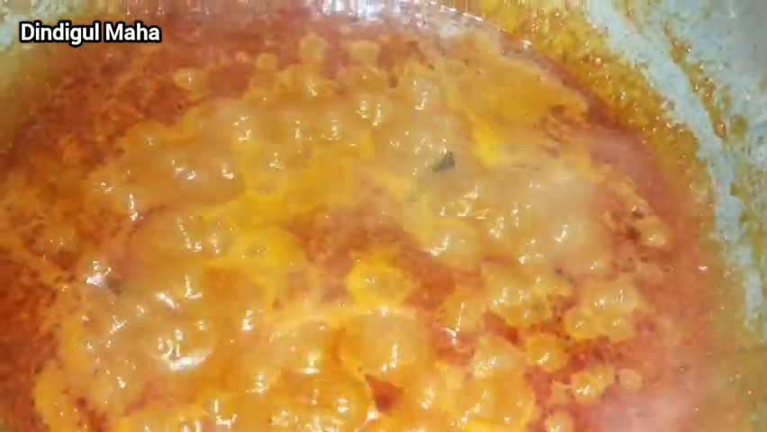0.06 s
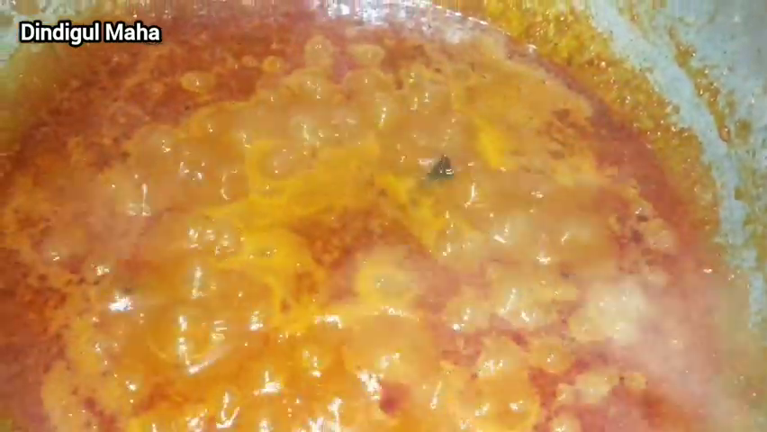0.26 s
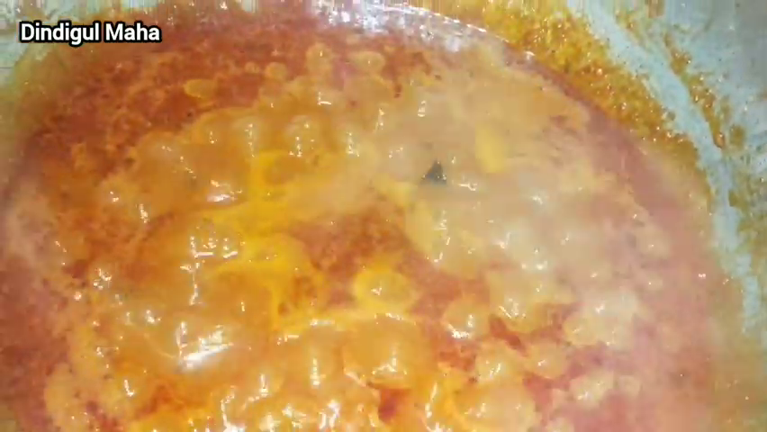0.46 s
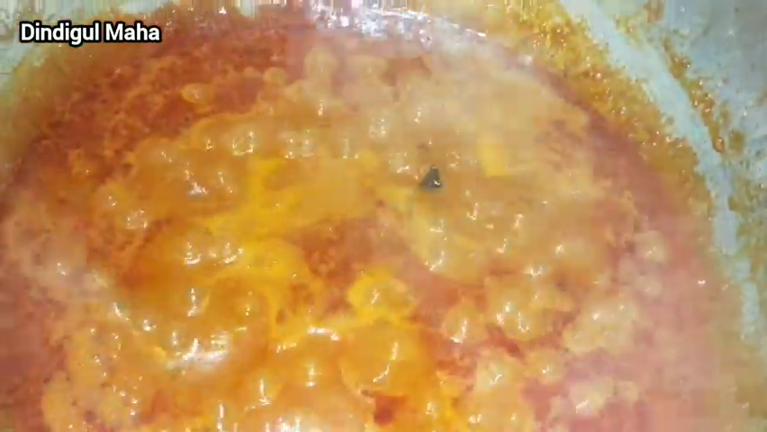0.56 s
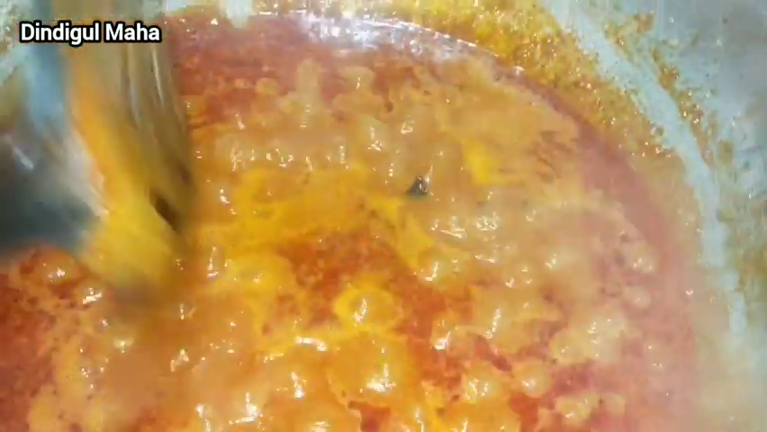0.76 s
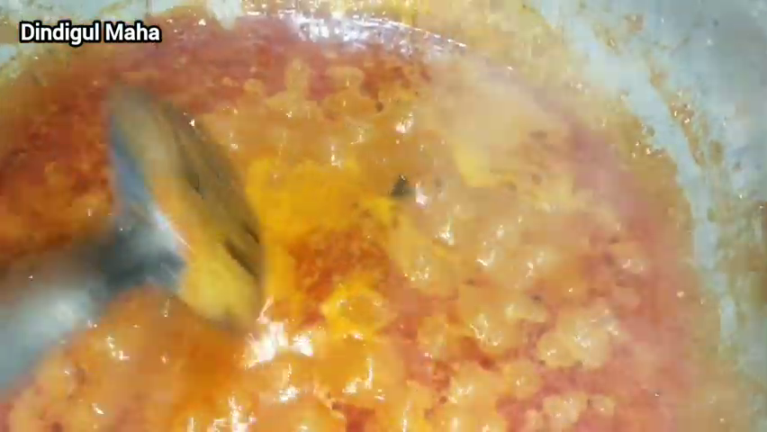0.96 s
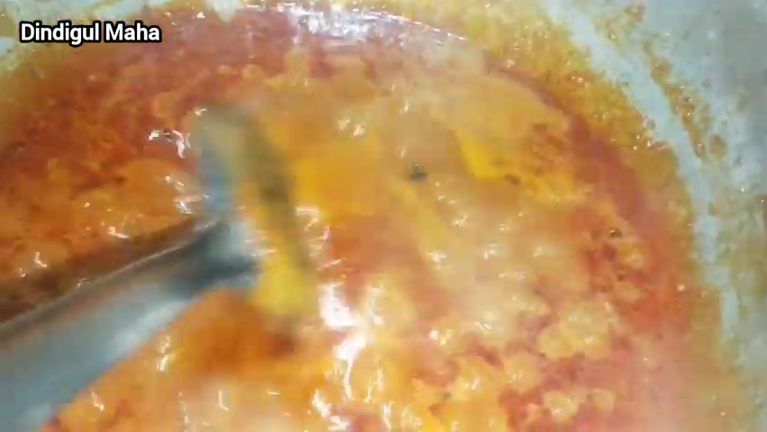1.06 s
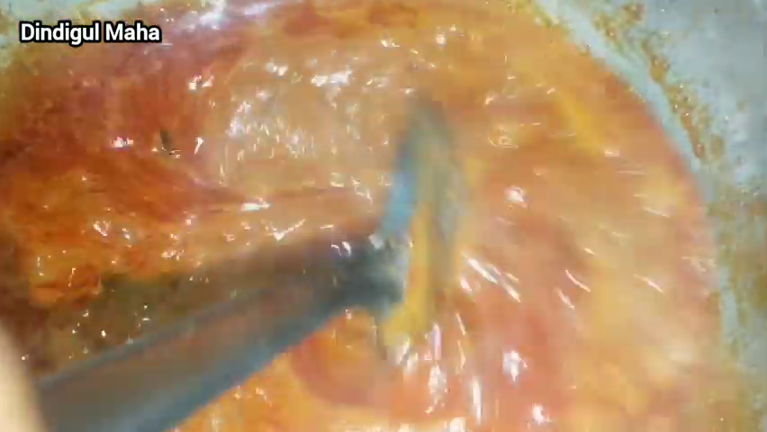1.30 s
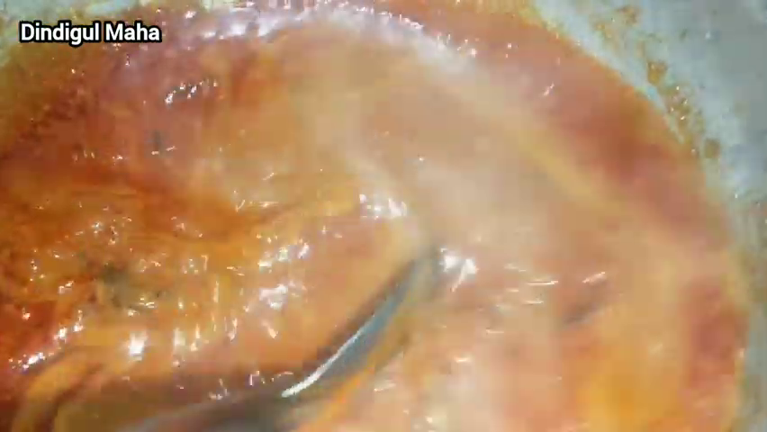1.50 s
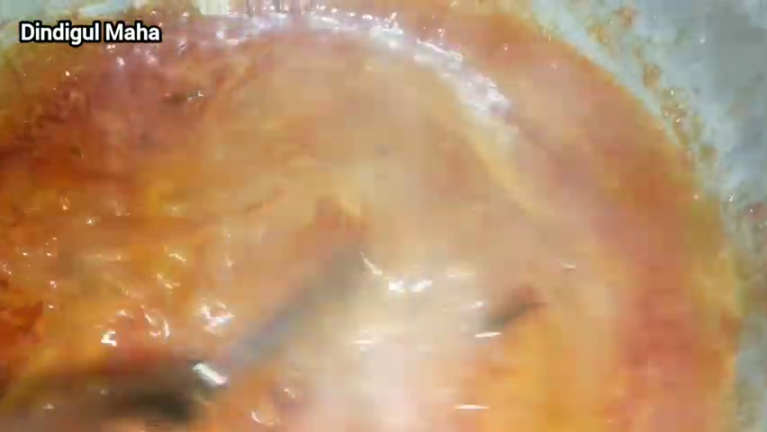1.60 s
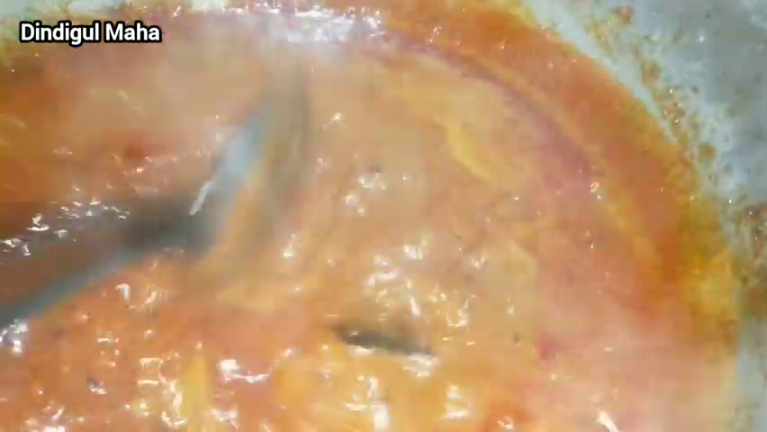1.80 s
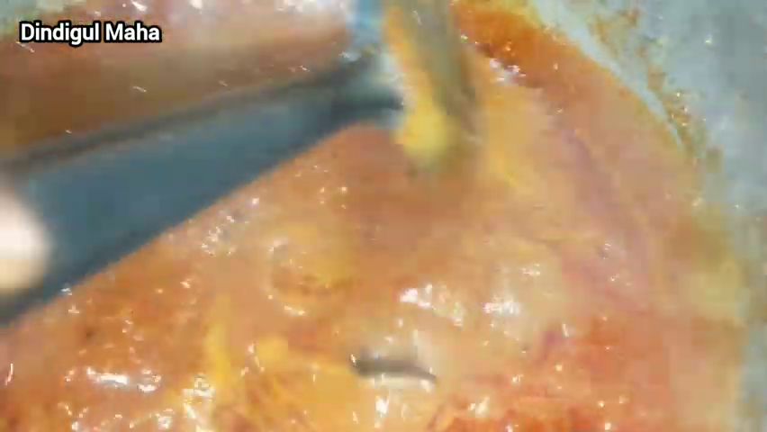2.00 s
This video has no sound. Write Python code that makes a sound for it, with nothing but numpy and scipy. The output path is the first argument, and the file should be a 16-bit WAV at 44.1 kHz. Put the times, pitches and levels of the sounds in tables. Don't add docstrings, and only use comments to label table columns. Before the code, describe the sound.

Bubbling thick sauce with faint steam hiss, a hard steel ladle knock early, low burner drone

```python
import sys
import numpy as np
from scipy import signal
from scipy.fft import rfft, irfft
from scipy.io import wavfile
from scipy.ndimage import uniform_filter1d

SR = 44100
rng = np.random.default_rng(int(sys.argv[2]) if len(sys.argv) > 2 else 0)


def volts(x):
    e = np.asarray(x, float) / 20
    return 10 ** e


def dump_mix(stems):
    frames = np.atleast_2d(stems).T
    limited = np.clip(frames, -1, 1)
    pcm = np.round(limited * 32767).astype(np.int16)
    wavfile.write(sys.argv[1], SR, pcm)


N = 90404
TIME_S = np.arange(N) / SR
BINS = np.fft.rfftfreq(2048, 1 / SR)

# hz, level_db (per Hz)
SAUCE_SPECTRUM = [(140, -11), (595, -11), (933, -12.5), (2530, -12.5), (3260, -15), (3890, -18.5),
                  (5020, -20), (11000, -46.5), (15000, -58.5)]


def evened(x):
    return x / np.sqrt(np.mean(x ** 2) + 1e-20)


def read(points, hz):
    f, value = np.transpose(points)
    return np.interp(np.log(hz + 1), np.log(f + 1), value)


def add(mix, s, sound):
    part = mix[round(s * SR):][:len(sound)]
    part += sound[:len(part)]


def causal(db):
    log_gain = np.log(volts(np.maximum(db, -100)))
    mirrored = np.r_[log_gain, log_gain[-2:0:-1]]
    return np.fft.ifft(np.exp(np.conj(signal.hilbert(mirrored)))).real


def port_pair(left, other, hz):
    # hz, likeness (-1 to 1)
    likeness = [(60, 1), (180, 0.95), (550, 0.59), (1650, -0.46), (4970, 0.87), (15000, -0.88)]
    same = np.clip(read(likeness, hz), -1, 1)[:, None]
    return np.array([left, same * left + np.sqrt(1 - same ** 2) * other])


def burner():
    # pitch_hz, width_hz, level_db
    drone = [(75.1, 9, -66.5), (101.65, 4, -59.5), (126.5, 4.7, -65.5), (180.7, 6.1, -65)]
    # hz, level_db (per Hz)
    rumble = [(12, -46), (20, -26), (48, -11), (76, -20), (97, -16), (195, 2), (260, -19), (340, -43),
              (570, -120)]
    # time_s, level_db
    flame = [(0, -3.5), (.3, 3), (0.549, 3), (.75, 3), (.85, 3), (1.101, 2.5), (1.25, 2), (1.45, -6),
             (1.652, -1.5), (1.75, -1.5), (1.87, -0.5), (2.05, -4)]
    rumble_db, hum_hz, hum_db = -67.5, 102, -55.5
    hz = np.fft.rfftfreq(N, 1 / SR)
    power = (volts(rumble_db) * evened(volts(read(rumble, hz) - 200 * (hz > 300)))) ** 2
    for pitch_hz, width_hz, level_db in drone:
        resonance = 1 / (1 + (2 * (hz - pitch_hz) / width_hz) ** 2)
        power += (volts(level_db) * evened(resonance)) ** 2
    noise = rng.standard_normal((2, N))
    common, apart = irfft(rfft(noise, axis=1) * np.sqrt(power), N, axis=1)
    common = common + volts(hum_db) * np.sin(2 * np.pi * hum_hz * TIME_S)
    ports = np.array([common + 0.084 * apart, common - 0.093 * apart])
    return ports * volts(np.interp(TIME_S, *np.transpose(flame)))


def kitchen(x):
    # hz, t60_s
    decay = [(300, 0.44), (1000, 0.28), (2000, 0.25), (5000, 0.28), (12000, 0.38)]
    rise_s = 0.008
    out, turn = 0, TIME_S * 7
    for k in range(3):
        hz, t, z = signal.stft(rng.standard_normal((2, SR * 3 // 4)), SR, nperseg=256)
        z = port_pair(z[0], z[1], hz)
        t60_s = np.maximum(read(decay, hz), 0.05)[:, None]
        tail = signal.istft(z * volts(-60 * t / t60_s), SR, nperseg=256)[1]
        tail = tail * np.minimum(np.arange(tail.shape[1]) / SR / rise_s, 1) ** 2
        tail = tail / np.linalg.norm(tail[0])
        window = np.sqrt(2 / 3) * np.cos(turn + k * np.pi / 3)
        out = out + signal.fftconvolve((x * window)[:, None], tail[None], axes=2)[..., :N]
    return out


def simmer_db(t):
    # time_s, level_db
    boil = [(0, -45.5), (.09, -52), (.46, -41.5), (.68, -45.5), (.82, -44.5), (1.19, -45), (1.36, -46),
            (1.42, -48.5), (1.66, -52.5), (1.745, -54.5), (1.785, -45), (1.851, -51.5), (1.96, -53.5),
            (2.05, -52)]
    return np.interp(t, *np.transpose(boil))


def hiss():
    patch_db, flicker_db, hiss_db = 2, 4, -3.5
    tilt_per_octave, dulling = 0.1, 0.6
    frames, hz = N // 64 + 6, np.fft.rfftfreq(256, 1 / SR)
    column_hz = hz[:, None]
    a, b, c, d, patches, flicker = rng.standard_normal((frames, 129, 6)).T
    patches = evened(uniform_filter1d(uniform_filter1d(patches, size=3, axis=0), size=40, axis=1))
    flicker = evened(uniform_filter1d(uniform_filter1d(flicker, size=20, axis=0), size=2, axis=1))
    boil_db = simmer_db(np.arange(frames) * 64 / SR) + 50
    tilt_db = tilt_per_octave * np.log2(np.maximum(column_hz, 1000) / 1000) * boil_db / 2
    tilt_db = tilt_db + dulling * np.minimum(boil_db, 0) / (1 + (1050 / (column_hz + 1)) ** 6)
    patches_db = patch_db * np.sqrt(1 + (column_hz / 4000) ** 2) * patches
    level_db = read(SAUCE_SPECTRUM, column_hz) + patches_db + flicker_db * flicker + tilt_db
    z = port_pair(a + 1j * b, c + 1j * d, hz) * volts(level_db)
    noise = evened(signal.istft(z, nperseg=256, noverlap=192)[1][:, :N])
    return volts(simmer_db(TIME_S) + hiss_db) * noise


def bubble(hz, cycles):
    glide = 0.067
    u = np.arange(round(3 * cycles * SR / hz)) * hz / SR / cycles
    tone = np.sin(2 * np.pi * cycles * (u + glide * u ** 2 / 2))
    onset = np.sin(np.minimum(u * 3.3, np.pi / 2)) ** 2
    return tone * onset * np.exp(-u * 2.52)


def big_bubbles():
    # start_s, level_db, pitch_hz
    bursts = [(0.863, -42, 555), (0.864, -34, 1500), (0.816, -32, 990), (0.989, -35, 1150),
              (1.034, -28.5, 1750), (1.038, -35, 1720), (1.044, -43, 2060), (1.029, -33.5, 575),
              (1.078, -53, 1500), (1.101, -40, 1090), (1.129, -34, 740), (1.1286, -48, 2080),
              (1.168, -38, 1750), (1.1835, -32, 1950), (1.207, -39, 653), (1.234, -38, 2300),
              (1.283, -58, 606), (1.317, -58, 2570), (1.457, -43, 750), (1.629, -36.5, 1150),
              (1.63, -41, 1990), (1.678, -42, 805), (1.792, -43, 1277), (1.805, -45.5, 664),
              (1.9228, -38, 1640), (2.038, -38.5, 766), (0.9, -34, 990), (0.922, -30, 1200),
              (0.925, -36, 1870), (1.015, -31.5, 844), (1.03, -24.5, 1630), (1.066, -39, 667),
              (1.115, -33, 652), (1.167, -46, 620), (1.319, -40, 640), (1.338, -33.5, 710),
              (1.423, -62, 595), (1.486, -34, 1700), (1.562, -34.5, 3030), (1.586, -33.5, 2357),
              (1.623, -39, 616), (1.759, -34, 1356), (1.837, -36.5, 1110), (1.861, -32.5, 1287),
              (1.922, -52, 530), (1.973, -46, 653), (1.994, -59, 713), (2.016, -53, 628)]
    # start_s, level_db, pitch_hz
    crackles = [(1.0463, -38.5, 5400), (1.17, -46, 2100), (1.3478, -40, 2500), (1.4871, -38.5, 2560),
                (1.5637, -40, 3200), (1.587, -46, 2840), (1.688, -49, 3150), (1.7576, -38, 2100),
                (1.764, -35, 2200), (2.1, -38, 2900), (1.7876, -46, 2330), (1.7879, -32.5, 3280),
                (1.805, -56, 1300), (1.7955, -37, 4050), (0.6, -63, 2000), (1.6, -44, 2700),
                (1.82, -40, 3900), (1.564, -42, 3650), (2.8, -44.5, 3600), (2.047, -46, 3100),
                (1.8888, -42.5, 4830), (1.9394, -39, 4470), (2.04, -46.5, 4700)]
    out = np.zeros(N)
    for start_s, level_db, pitch_hz in bursts:
        add(out, start_s, volts(level_db + 4.5) * bubble(pitch_hz, 4.56))
    for start_s, level_db, pitch_hz in crackles:
        add(out, start_s, volts(level_db + 11) * bubble(pitch_hz, 3.5 * pitch_hz / 2500))
    return out


def fizz():
    bubbles_per_s, spread_db, fizz_db = 360, 2.5, -10.5
    size = volts(np.minimum(spread_db * rng.exponential(1, N), 7))
    size = size * (rng.random(N) < bubbles_per_s / SR)
    kind, pitches_hz = rng.integers(0, 24, N), np.geomspace(520, 5000, 24)
    out = np.zeros(N)
    for k, hz in enumerate(pitches_hz):
        pop = volts(read(SAUCE_SPECTRUM, hz) + 1.4 * np.log2(hz)) * bubble(hz, 3.37)
        out += signal.oaconvolve(size * (kind == k), pop)[:N]
    return volts(simmer_db(TIME_S) + fizz_db) * evened(out)


def knock(level_db, rattle_s, treble_db, ring_db):
    # hz, level_db (per Hz)
    clatter = [(150, -26.5), (300, -16.5), (700, -8.5), (1040, -0.5), (1350, -1), (1900, 1.5),
               (3980, -11.5), (5250, -17), (16000, -38)]
    # pitch_hz, level_db, t60_s
    steel = [(470, -11.5, 0.1), (1043, 2.5, 0.19), (1286, -3.5, 0.4), (1365, -3, 0.27), (1557.6, 0.5, .4),
             (1732, 3.5, 0.35), (2160, -7.5, 0.14), (2428, -15, .3), (2820, -4, .2), (2979, -8.5, 0.35),
             (4517, -13.5, 0.43), (5280, -5, 0.05), (6150, -14.5, 0.091), (6470, -8, 0.079)]
    blow_s, rattle_db, pivot_hz, ripple_db = 0.0011, -16, 3240, 4
    ring_base_db, detune, scatter_db, ring_max_s = -14, 0.0018, 2, 0.3
    t = np.arange(SR // 2) / SR
    noise = rng.standard_normal((2, len(t)))

    blow = volts(0.43 * (level_db + 1.5)) * np.exp(-t / blow_s)
    uneven_db = 5.4 * evened(uniform_filter1d(noise[1], size=60))
    rattle = volts(rattle_db + uneven_db) * np.exp(-t / max(rattle_s, 0.002))
    colour = read(clatter, BINS) + treble_db * np.tanh(2 * np.log((BINS + 1) / pivot_hz))
    colour = colour + ripple_db * evened(uniform_filter1d(rng.standard_normal(len(BINS)), size=3))
    broad = signal.fftconvolve(noise[0] * (blow + rattle), causal(colour))[:len(t)]
    broad = broad / np.std(broad[:400])

    ring = np.zeros(len(t))
    for hz, db, t60_s in steel:
        strength, pitch = rng.standard_normal(2)
        decay_s = np.clip(t60_s * volts(ring_db / 2), 0.04, ring_max_s)
        mode_db = db + scatter_db * strength + treble_db * np.sign(hz - pivot_hz) - 60 * t / decay_s
        ring += volts(mode_db) * np.sin(2 * np.pi * hz * (1 + detune * pitch) * t)
    ring = evened(ring * np.minimum(t / blow_s, 1))
    return volts(level_db) * (broad + volts(ring_base_db + ring_db) * ring / 2)


def ladle():
    # start_s, level_db, rattle_s, treble_db, ring_db (share of ringing)
    knocks = [(0.097, -31, 0.033, 5, -24), (0.122, -34, 0.06, 1.5, -3), (0.126, -49, 0.028, -17, -6),
              (0.151, -38.5, 0.039, 5.5, -4), (0.227, -8, 0.01, 2, 0), (0.244, -22, 0.06, 2, -1),
              (0.347, -27, 0.01, -7.5, -2), (0.354, -23, 0.03, 7, -23), (0.371, -26, 0.015, 6.5, -7),
              (0.393, -18, 0.012, 1.5, -4.5), (0.402, -21, 0.01, -1, -3), (0.484, -33.5, 0.01, 2, 4),
              (0.517, -30, 0.0073, 5.5, 5.5), (0.527, -26.5, 0.008, -10.5, -30),
              (0.537, -28, 0.008, -2.5, -31), (0.544, -22, 0.008, -1.5, 1), (0.549, -25.5, 0.008, 2, -2),
              (0.646, -30, 0.015, 7, -3), (0.661, -27.5, 0.011, -4, 0), (0.717, -40, 0.004, -3.5, -1),
              (0.732, -46, 0.004, 7.5, 3), (0.76, -39, 0.0067, 4.5, -16), (0.768, -35, 0.006, 0, -2.5),
              (0.814, -47.5, 0.007, 5.5, -22), (1.041, -46.5, 0.0067, 9.5, -29)]
    out = np.zeros(N)
    for start_s, *blow in knocks:
        add(out, start_s, knock(*blow))
    return out


def scene():
    lag = 6
    ladle_db, ladle_room_db, sauce_room_db, sauce_left_db = -7, 0.5, -5.5, -5.5
    near = np.array([volts(ladle_db) * ladle(), big_bubbles() + fizz()])
    direct = np.stack([np.roll(near, lag, axis=1), near], axis=1)
    heard = direct + kitchen(near * volts([[ladle_room_db], [sauce_room_db]]))
    pot = heard[1] + hiss()
    return heard[0] + pot * volts([[sauce_left_db], [0]]) + burner()


def microphone_ports(x):
    # hz, left_minus_right_db
    balance = [(60, 1.7), (130, -0.5), (300, 1), (1000, -2), (2200, -1), (3400, 2.5), (4600, 19),
               (8000, 18), (15000, 11.5)]
    # centre_hz, width_hz, level_db
    resonances = [(3925, 350, -14), (6500, 640, -4), (8150, 650, -8.5), (5460, 1540, 8.5), (11970, 1600, 5)]
    low_cut_hz, top_hz = 50, 15700
    colour = sum(db / (1 + (2 * (BINS - hz) / width) ** 2) for hz, width, db in resonances)
    colour = colour - 10 * np.log10(1 + (low_cut_hz / (BINS + 1)) ** 4)
    colour = colour - 10 * np.log10(1 + (BINS / top_hz) ** 150)
    lean = read(balance, BINS) / 2
    left = causal(colour + np.minimum(lean, 0))
    right = causal(colour - np.maximum(2 * lean, 0) - np.minimum(lean, 0))
    return signal.fftconvolve(x, np.array([left, right]), axes=1)[:, :N]


def noise_reduction(x):
    quiet_percent, over_db, depth_db = 35, 3, -10
    z = signal.stft(x, nperseg=512, noverlap=384)[2]
    power = uniform_filter1d((abs(z) ** 2).sum(0), size=14, axis=1)
    level_db = 10 * np.log10(power + 1e-16)
    quiet_db = uniform_filter1d(np.percentile(level_db, quiet_percent, axis=1), size=9)[:, None]
    shut = np.clip((quiet_db + over_db - level_db) / 15.5, 0, 1)
    shut = shut * (np.arange(len(quiet_db)) > 8)[:, None]
    return signal.istft(z * volts(depth_db * shut), nperseg=512, noverlap=384)[1][:, :N]


def roll_off(x):
    return signal.sosfilt(signal.butter(12, 15850, fs=SR, output="sos"), x)


def record(dry):
    mix = noise_reduction(microphone_ports(dry))
    return roll_off(mix)


dry = scene()
out = record(dry)
dump_mix(out)
```